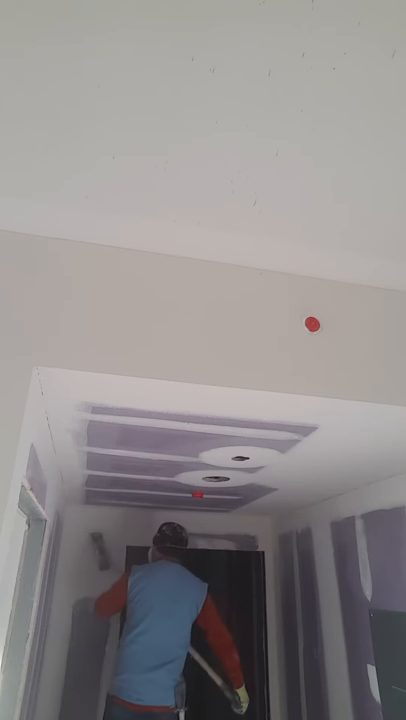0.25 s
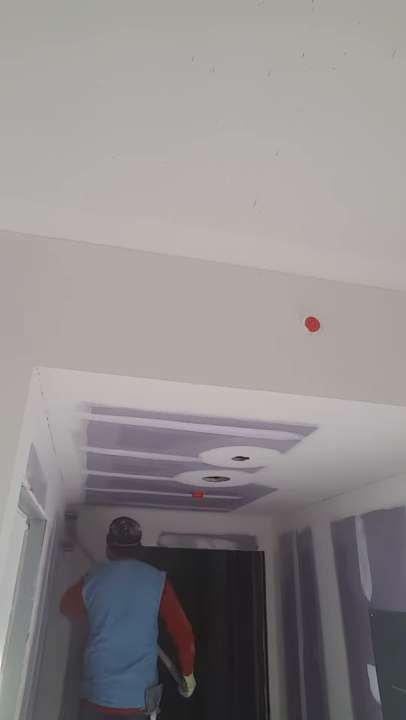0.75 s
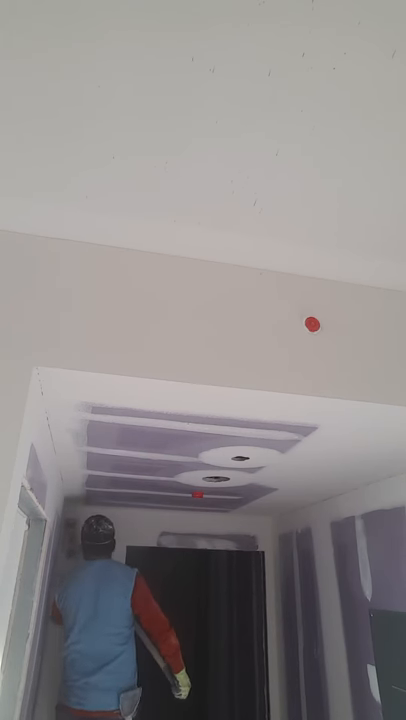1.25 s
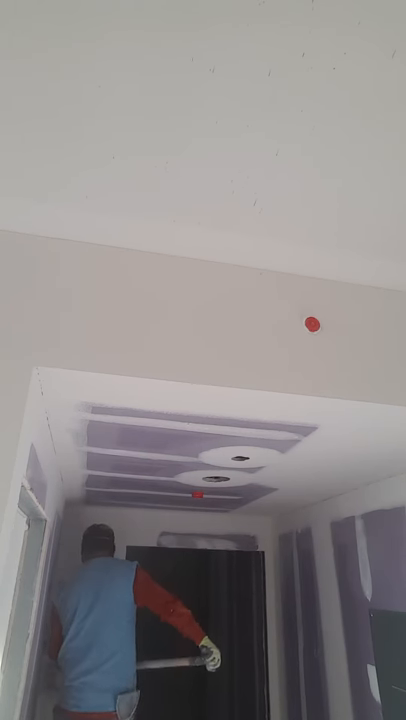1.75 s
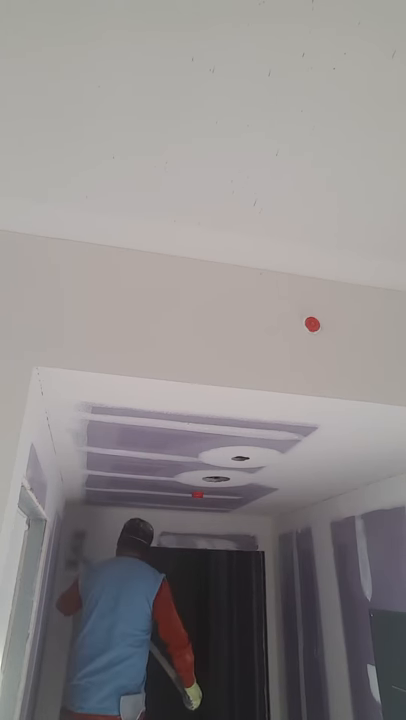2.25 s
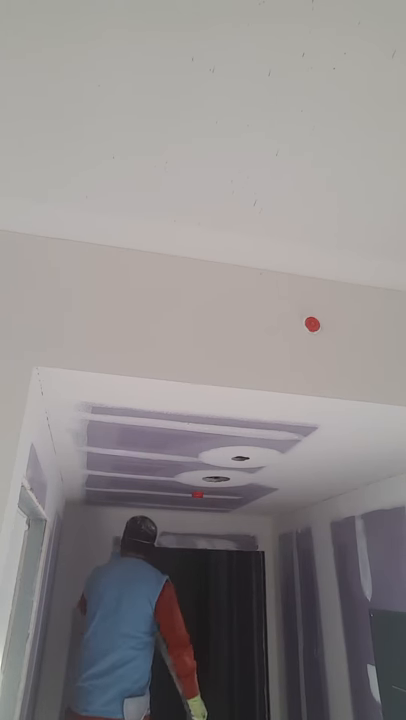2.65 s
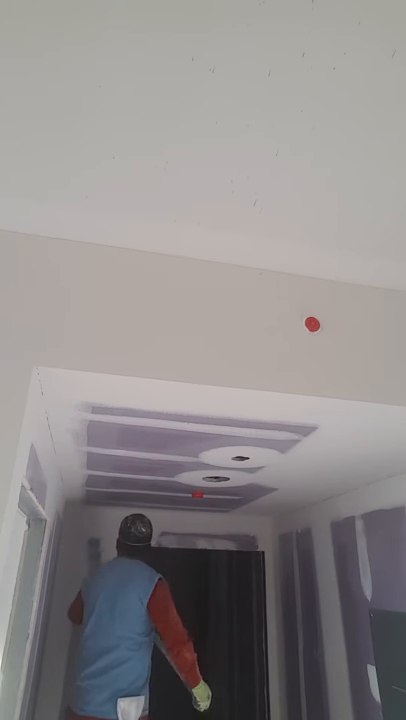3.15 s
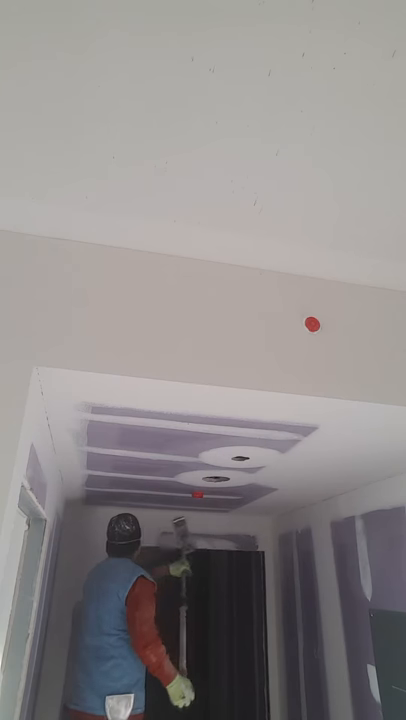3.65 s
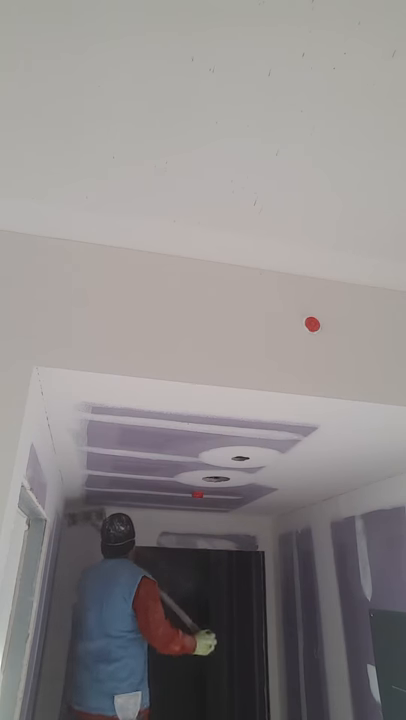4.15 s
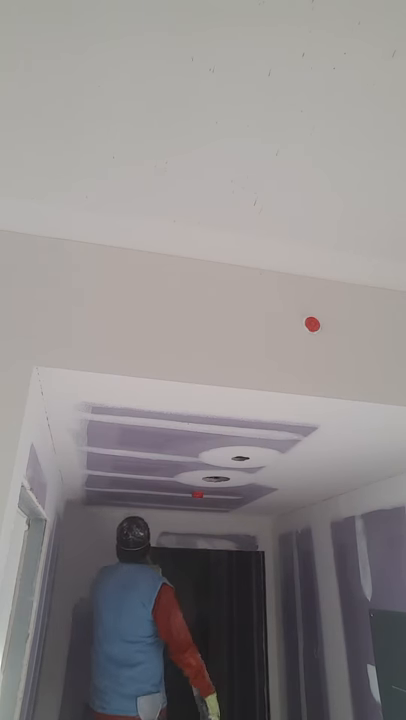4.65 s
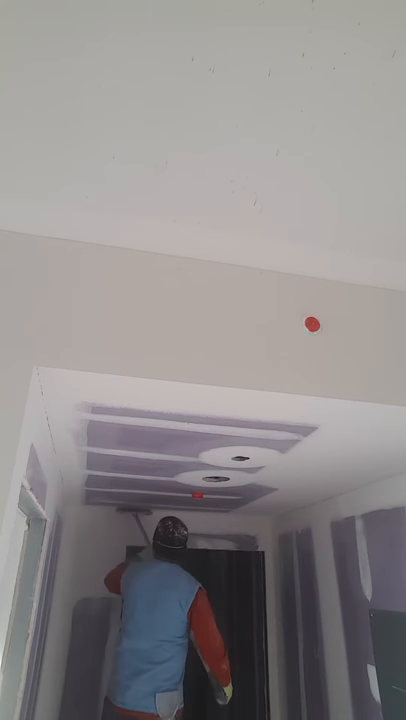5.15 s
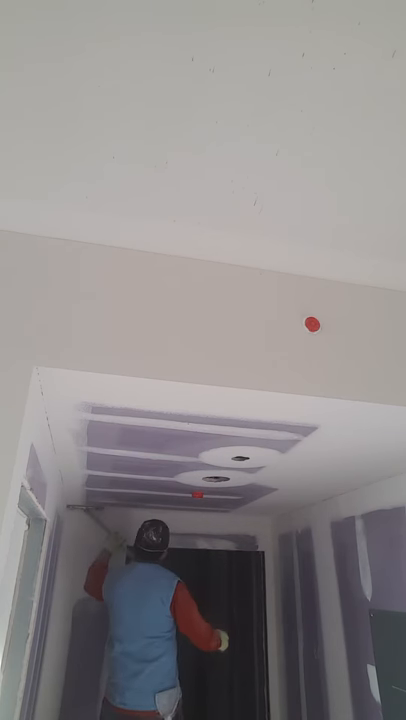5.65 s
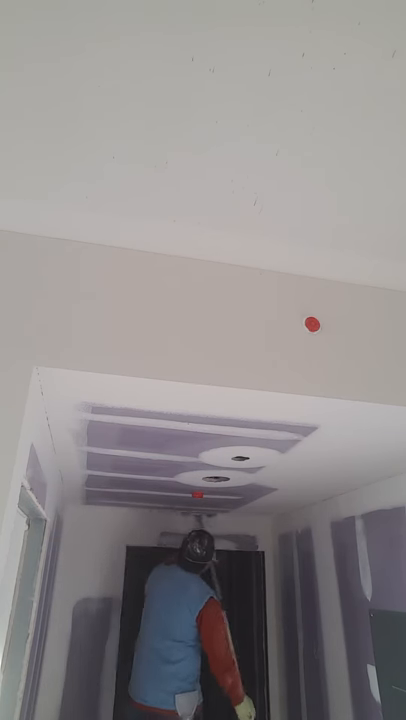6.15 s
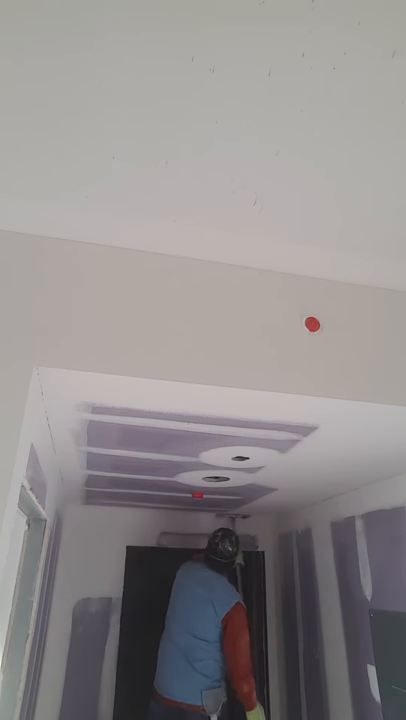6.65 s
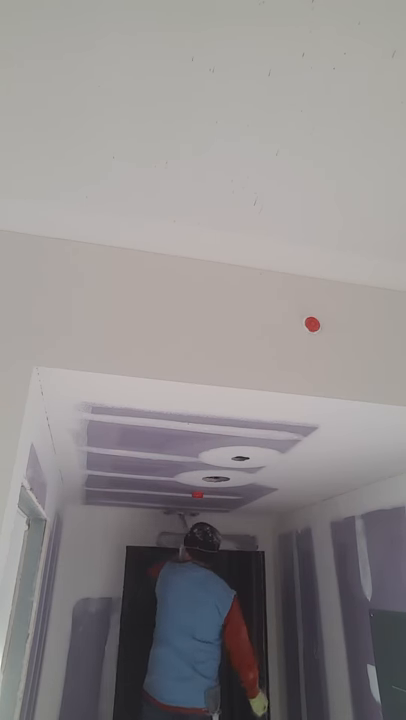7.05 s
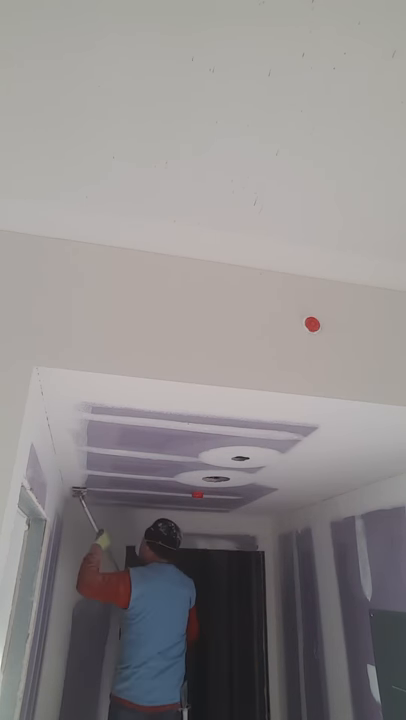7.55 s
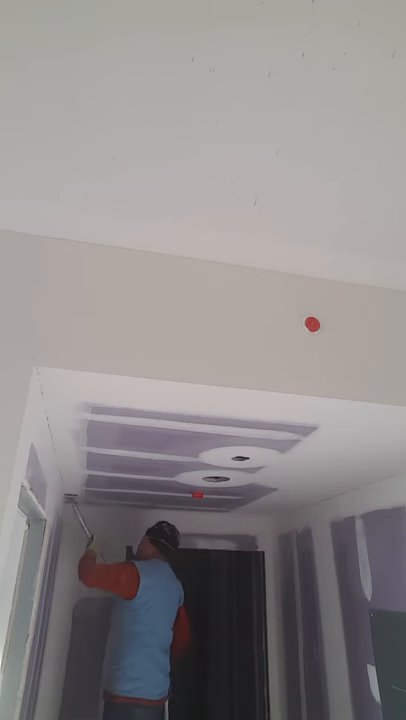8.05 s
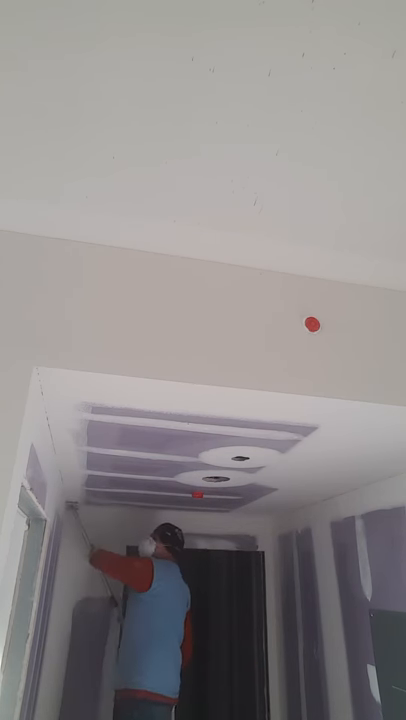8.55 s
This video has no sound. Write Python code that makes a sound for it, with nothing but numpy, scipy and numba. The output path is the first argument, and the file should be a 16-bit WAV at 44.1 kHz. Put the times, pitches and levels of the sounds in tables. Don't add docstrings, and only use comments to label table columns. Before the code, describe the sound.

A worker some metres away drags a pole sander over dry wall filler in quick, overlapping hissing sweeps. The pad head knocks corners with hollow, boomy thuds, and the swivel clicks. Around four and a half to five seconds the scraping nearly stops, leaving clicks and soft foot shifts, then sanding resumes with a hard bump. Bare hallway reverberation and faint building hush, caught by a phone.

```python
import sys
import numpy as np
from scipy import signal
from scipy.fft import rfft, irfft, next_fast_len
from scipy.io import wavfile
from scipy.ndimage import uniform_filter1d
from numba import njit

SR = 44100
rng = np.random.default_rng(int(sys.argv[2]) if len(sys.argv) > 2 else 0)


def how_loud(loudness_db):
    steps = np.asarray(loudness_db, float) / 20
    return 10 ** steps


def to_wav(s):
    ch = np.atleast_2d(s).T
    pcm = np.round(np.clip(ch, -1, 1) * 32767)
    wavfile.write(sys.argv[1], SR, pcm.astype(np.int16))


N = 388521


def on_log(table, hz):
    f, v = np.transpose(table)
    return np.interp(np.log(np.maximum(hz, 1)), np.log(f), v)


def shape(x, table):
    n = next_fast_len(x.shape[-1])
    gain = how_loud(on_log(table, np.fft.rfftfreq(n, 1 / SR)))
    return irfft(rfft(x, n) * gain, n)[..., :N]


def band(x, lo_hz, hi_hz, order=2):
    edges = [lo_hz, min(hi_hz, 0.45 * SR)]
    return signal.sosfilt(signal.butter(order, edges, "band", fs=SR, output="sos"), x)


def unit(x):
    return x / np.sqrt(np.mean(x ** 2))


def walk(rate):
    k = int(SR / rate)
    held = np.repeat(rng.standard_normal(N // k + 1), k)
    return 1.35 * uniform_filter1d(uniform_filter1d(held, k), k)[:N]


def store(power, seconds):
    keep = np.exp(-1 / (seconds * SR))
    return signal.lfilter([1 - keep], [1, -keep], power)


def blows(times, peaks_db, lo_hz, hi_hz, rattle_ms):
    out, t = np.zeros(N + SR), np.arange(SR // 10) / SR
    decay = np.exp(-t * 1000 / max(rattle_ms, 0.5))
    rattle = 0.15 * rng.standard_normal((len(times), len(t))) * decay
    rings = band((t == 0) + rattle, lo_hz, hi_hz)
    push = band((t == 0) * 1.0, lo_hz, hi_hz)
    rings *= np.linalg.norm(push) / np.max(push) / np.linalg.norm(rings, axis=1, keepdims=True)
    for s, db, ring in zip(times, peaks_db, rings):
        out[int(s * SR):][:len(t)] += how_loud(db) * ring
    return out[:N]


def modes(x, table):
    out = 0
    for hz, db, t60 in table:
        r, w = how_loud(-60 / (t60 * SR)), 2 * np.pi * hz / SR
        ring = signal.lfilter([1], [1, -2 * r * np.cos(w), r * r], x)
        out = out + how_loud(db) * np.sin(w) * np.sqrt(1 - r * r) * ring
    return out


# f/Hz, correlation [-1 to 1]
LIKENESS = [(60, 0.96), (130, 0.91), (290, 0.78), (640, 0.38), (1410, -0.47), (3100, 0.23), (6820, -0.0069),
            (15000, -0.036)]


def diffuse():
    n = next_fast_len(N)
    mid, side = rfft(rng.standard_normal((2, n)))
    likeness = np.clip(on_log(LIKENESS, np.fft.rfftfreq(n, 1 / SR)), -0.95, 0.99)
    mid = mid * np.sqrt((1 + likeness) / 2)
    side = side * np.sqrt((1 - likeness) / 2)
    return irfft(np.array([mid + side, mid - side]), n)[:, :N]


# f/Hz, time to fall by 60 dB [s]
HALL_T60 = [(60, 0.67), (250, 0.99), (1000, 0.72), (3000, 0.54), (8000, 0.37), (16000, 0.11)]


def hall(direct, feed, wet_db, build_ms, early_share):
    left_lag = 7
    out = np.array([np.roll(direct, left_lag), direct])
    sides = diffuse()
    for k, lo in enumerate(50 * 2 ** np.arange(0, 8.5, 0.5)):
        hi = lo * np.sqrt(2)
        filled = store(band(feed, lo, hi) ** 2, build_ms / 1000)
        lasting = on_log(HALL_T60, lo) / np.log(1e6)
        early, late = store(filled, 0.11 * lasting), store(filled, lasting)
        energy = early_share * early + (1 - early_share) * late
        ring = unit(band(np.roll(sides, 9973 * k, axis=1), lo, hi))
        out = out + how_loud(wet_db) * np.sqrt(energy) * ring
    return out


# f/Hz, level/dB
HOUSE = [(15, -28), (25, -3), (87, 9.5), (185, 10), (575, 5.5), (1230, -1.5), (1890, 3), (8140, -14),
         (16000, -12)]


def house_hush():
    return how_loud(-36.5 - 8.0) * unit(shape(diffuse(), HOUSE))


# t/s, level/dB
STEPS = [(2.3, -42), (2.42, -35.5), (2.69, -35.5), (2.84, -35), (2.97, -38), (3.74, -38), (4.301, -40),
         (4.939, -39), (5.02, -42), (6.12, -43), (7.08, -38), (7.85, -37.5)]


def steps():
    s, db = np.transpose(STEPS)
    return blows(s, db - 7, 80, 143, 30) + blows(s, db - 9, 153, 238, 30)


# f/Hz, level/dB, time to fall by 60 dB [s]
POLE_RING = [(1004, -5.5, 0.068), (1386, -3.5, 0.43), (1570, 0, 0.011), (2290, -26, 0.21),
             (2830, 0.5, 0.041), (3860, -10, 0.021)]
# swivel ring level/dB, snap level/dB,
# share sent down the hallway level/dB
CLICKS = [
    (0.137, -28, 10, -1, -15.5),
    (0.15, -28, -26, -9, -7),
    (0.396, -37.5, -9, -9, -8),
    (4.409, -24, -2, -11, -12),
    (4.754, -34.5, -2.5, -12, -11),
    (4.905, -41, -12, -17, -11),
    (5.17, -40.5, 1, 2, -8.5),
    (5.215, -24, -8, -2, -12.5),
    (6.919, -26.5, -3, 4, -12),
    (7.008, -22.5, -6, -18, -17.5),
]


def clicks():
    s, db, ring_db, snap_db, far_db = np.transpose(CLICKS)
    pole = blows(s, db + 3, 495, 1890, 5.3)
    swivel = blows(s, db + ring_db + 5.0, 1870, 4040, 1.2)
    snap = blows(s, db + snap_db + 8, 4500, 14400, 6.3)
    hit = pole + swivel
    ticks = hit + modes(hit, POLE_RING) + snap
    latest = np.maximum(np.searchsorted(s, np.arange(N) / SR) - 1, 0)
    return ticks, ticks * how_loud(far_db[latest])


# t/s, length [s], grit hiss level/dB, fine dust minus hiss level/dB
STROKES = [(-.3, 0.35, -33, -8), (0.394, 0.51, -28.5, -13.5), (0.894, .28, -29.5, -13),
           (1.15, 0.23, -27, -12.5), (1.38, 0.087, -29, -14), (1.44, 0.26, -27, -14),
           (1.636, .27, -27.5, -8.5), (1.907, 0.47, -25.5, -13.5), (2.317, 0.26, -28.5, -10.5),
           (2.544, 0.24, -28.5, -11), (2.853, 0.26, -28, -11.5), (3.078, 0.28, -27, -13),
           (3.352, 0.39, -27, -11), (3.716, 0.54, -31, -9), (4.155, 0.3, -31, -9), (4.56, 0.52, -53.5, 0),
           (5.012, .3, -46, -10), (5.277, 0.34, -29, -12.5), (5.712, 0.45, -28, -11),
           (5.97, 0.43, -28.5, -10), (6.2, 0.33, -29, -13.5), (6.574, 0.36, -30, -10),
           (6.894, 0.071, -40, -12), (6.973, 0.33, -30, -8.5), (7.2, 0.4, -31, -11),
           (7.469, 0.31, -26.5, -10), (7.79, 0.4, -26.5, -11), (8.056, 0.35, -28, -14.5),
           (8.567, 0.017, -43, -6), (8.644, 0.29, -30, -14.5)]
# t/s, pressure level/dB
PRESSURE = [(0, 5), (.55, 1.5), (1.1, 0.5), (1.5, 0.5), (2.0, -6), (2.6, 1.5), (3.1, 0), (3.7, -3.5),
            (4.25, 4.5), (4.9, -16), (5.45, 5), (5.85, 0), (6.3, 2), (6.9, 0), (7.4, 1.5), (7.9, 1.5),
            (8.3, 2), (8.81, 0)]


def motion():
    roundness, skew = 0.76, 1.05
    dust_power = 1.45
    t = np.arange(N) / SR
    hiss, dust, speed = 1e-8, 1e-9, 1e-6
    for s, length, db, dust_db in STROKES:
        progress = np.clip((t - s) / length, 0, 1)
        arc = np.abs(np.sin(np.pi * progress ** skew)) ** (2 * roundness)
        hiss = hiss + arc * how_loud(2 * db)
        dust = dust + arc ** dust_power * how_loud(2 * (db + dust_db))
        speed = speed + arc
    speed_db = 10 * np.log10(np.minimum(speed, 1))
    pressure_db = np.interp(t, *np.transpose(PRESSURE))
    return 10 * np.log10(hiss), 10 * np.log10(dust), speed_db, pressure_db


# f/Hz, level/dB
BOARD = [(24, -53.5), (40, -15), (120, -12.5), (166, -1), (198, -3), (404, 4.5), (654, 6.5), (706, -14),
         (1560, 2.5), (1820, -18.5), (4000, -16), (5200, -54), (8800, -120)]


def drone():
    hiss_db, _, speed_db, pressure_db = motion()
    speed_power = 0.6
    drag_db = hiss_db - (2.5 - speed_power) * np.maximum(speed_db, -15) + pressure_db - 16
    s, db = np.transpose(KNOCKS)[:2]
    jolts = np.bincount((s * SR).astype(int), how_loud(db - 18) ** 2 * SR / 5, N)
    chatter = store(store(jolts, 0.056), 0.075)
    power = how_loud(drag_db) ** 2 + chatter
    shudder_db = 2.5 * walk(12)
    return unit(shape(rng.standard_normal(N), BOARD)) * np.sqrt(power) * how_loud(-19.5 + shudder_db)


# low f/Hz, high f/Hz, rattle [ms]
BODIES = [
    (320, 530, 8.5),
    (92.7, 145, 4),
    (167, 324, 25),
    (542, 1180, 4.6),
    (1680, 1930, 7),
]
# depth level/dB, pad slap level/dB,
# edge crack level/dB
KNOCKS = [(.411, -14, 3.5, -22, -18), (.749, -6, -12.5, 4.5, -1.5), (1.342, -5, -11, -13, -3.5),
          (1.453, -10.5, -4.5, 6.5, -1), (1.832, -7, -4, -1, -4), (3.07, -25, 3.5, -19, -14),
          (3.29, -10, -1, -6, -3.5), (3.927, -28, 8.5, -22, -19), (4.163, -13.5, -8.5, 3, -6),
          (5.213, -36.5, 13, -2, -9), (5.298, -9, -8.5, 3.5, -11), (5.528, -3, -5, 0.5, -6),
          (5.804, -9.5, -11.5, 3, -12), (6.518, -9, -8.5, 3, -20), (6.863, -9.5, -7, -2, -24),
          (7.007, -26.5, 0, 1, -14), (7.714, -18.5, -6, 10, 1), (8.354, -6, -10, 1, -5)]
NUDGES = [(.363, -56, 12, 2, 0), (.8, -9.5, -15.5, -5, -6), (1.317, -39.5, -11, 19.5, 13),
          (1.4, -13.5, -14, -15, -14), (1.784, -23, 0.5, 2.5, -6), (2.552, -30.5, 4.5, -2, 0),
          (3.339, -20, -1, -15, -20), (3.41, -20.5, -0.5, -22, -26), (4.876, -39.5, -15, 13, 0),
          (4.937, -38.5, 0, -14, -10), (5.169, -46.5, 15.5, 5, -5), (5.409, -35, -13, -11, -19),
          (5.6, -12, -3, 0, -10), (5.7, -19, -4, -13, -25), (6.572, -13, -27, -20, -17),
          (6.645, -44, -26, -8, -13), (6.83, -15.5, -20, -0.5, -21), (6.92, -24, -3, 6, -19),
          (8.078, -23.5, -6.5, 4.5, -2), (8.388, -10.5, -20, 3.5, -4), (0.403, -29, 8, -15, -20),
          (7.201, -43, -3.5, -6, -20), (8.445, -11, -19, -8, -18)]


def bumps():
    s, board_db, depth_db, slap_db, crack_db = np.transpose(KNOCKS + NUDGES)
    boom_db = 1.38 * depth_db - 7
    shares = [0 * s, boom_db, depth_db, slap_db, crack_db]
    return sum(blows(s, board_db + db - 8.5, *body) for db, body in zip(shares, BODIES))


# f/Hz, level/dB, time to fall by 60 dB [s]
STANDING = [(127.8, -15.5, 0.3), (194.3, -13, 0.6), (245.4, -12, 0.13), (342.7, -24.5, 0.57),
            (399.7, -9.5, 0.22), (475.4, -11.5, 0.21), (588, -17.5, 0.45)]


def standing_waves(thuds):
    return modes(thuds, STANDING) * how_loud(1.0)


# f/Hz, level/dB
GRIT = [(700, -6), (1300, -15), (2200, -3), (4000, 0), (6000, 1.5), (9000, 0.5), (16000, -0.5)]


def sanding():
    hiss_db, dust_db, speed_db, pressure_db = motion()
    speed_power = 0.39
    scrape_db = hiss_db - (1 - speed_power) * np.maximum(speed_db, -15) + pressure_db - 9.5
    grains = rng.standard_normal(N) * how_loud(2.0 * rng.exponential(size=N))
    grit = shape(grains, GRIT)
    coarse_db = scrape_db - 2.0 + 1.2 * walk(20)
    middle_db = hiss_db - 7.5 + 1.2 * walk(30)
    fine_db = dust_db + 3.5 + 1.5 * walk(30)
    sharp_db = (hiss_db + dust_db) / 2 - 12.5 + 2.3 * walk(11)
    coarse = unit(band(grit, 810, 3290)) * how_loud(coarse_db)
    middle = unit(band(grit, 3670, 7200, order=3)) * how_loud(middle_db)
    fine = unit(band(grit, 7100, 22200, order=3)) * how_loud(fine_db)
    sharp = unit(band(grit, 6090, 8000, order=3)) * how_loud(sharp_db)
    rasp = coarse + middle + sharp + fine
    heard = hall(rasp, rasp, wet_db=5.0, build_ms=1, early_share=0.6)
    lean_db = 0.5 * (0.3 - store(how_loud(speed_db), 0.033))
    return heard * how_loud(np.array([lean_db, -lean_db]) / 2)


# f/Hz, left minus right level/dB
PORTS = [(60, -6), (110, -0.5), (200, -3), (380, -1), (700, -7.5), (1290, -1.5), (2380, -3.5), (4400, -13),
         (8120, -8.5), (15000, -3.5)]


def scene():
    thuds = bumps() + drone() + steps()
    ticks, far_ticks = clicks()
    direct = how_loud(-1.5) * thuds + ticks
    knocks = hall(direct, thuds + far_ticks, wet_db=13.0, build_ms=0.6, early_share=0.19)
    left, right = house_hush() + standing_waves(thuds) + knocks + sanding()
    lean = np.array(PORTS) * [1, 0.5]
    return np.array([shape(left, lean), shape(right, lean * [1, -1])])


@njit
def follow(x, attack, release):
    e, out = 0., np.empty(len(x))
    for i in range(len(x)):
        e += (x[i] - e) * (attack if x[i] > e else release)
        out[i] = e
    return out


def low_pass(x):
    return signal.sosfilt(signal.butter(12, 16420, fs=SR, output="sos"), x)


# f/Hz, level/dB
MIC = [(30, -2), (60, -6.5), (100, -0.5), (2500, 0), (2900, -1), (5600, 2.5), (8200, 0.5), (9300, -6.5),
       (14000, -8.5), (16000, -9)]


def record(dry):
    dry = shape(dry, MIC)
    attack_s, release_s = 0.0021, 0.12
    envelope = follow(np.max(abs(dry), axis=0), 1 / (attack_s * SR), 1 / (release_s * SR))
    gain = np.minimum(1, how_loud(-10.5) / (envelope + 1e-9)) ** 0.32
    rounded = np.tanh(dry * gain)
    top = signal.ellip(8, 0.2, 70, 15800, fs=SR, output="sos")
    return low_pass(signal.sosfilt(top, rounded))


dry = scene()
out = record(dry)
to_wav(out)
```